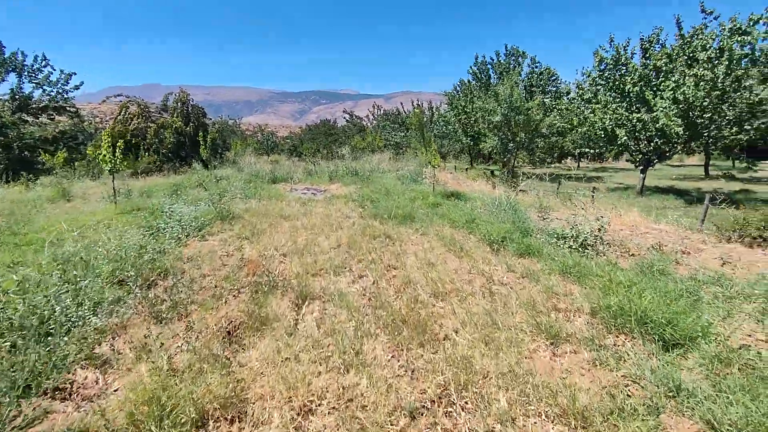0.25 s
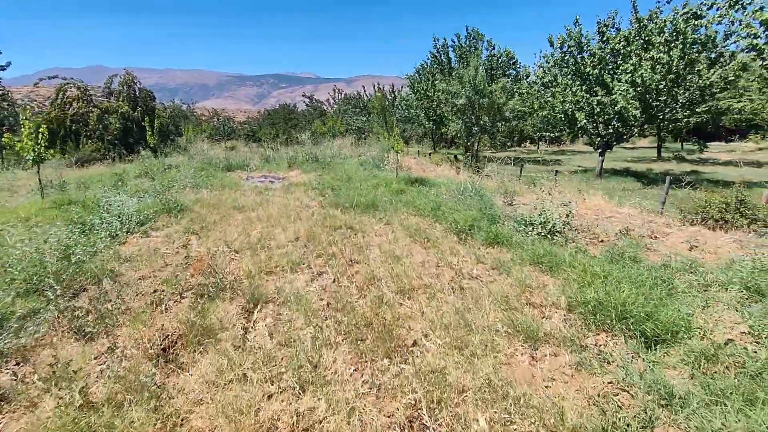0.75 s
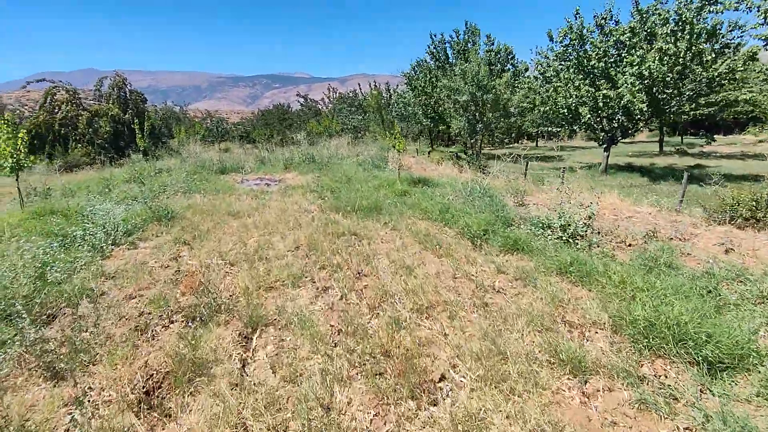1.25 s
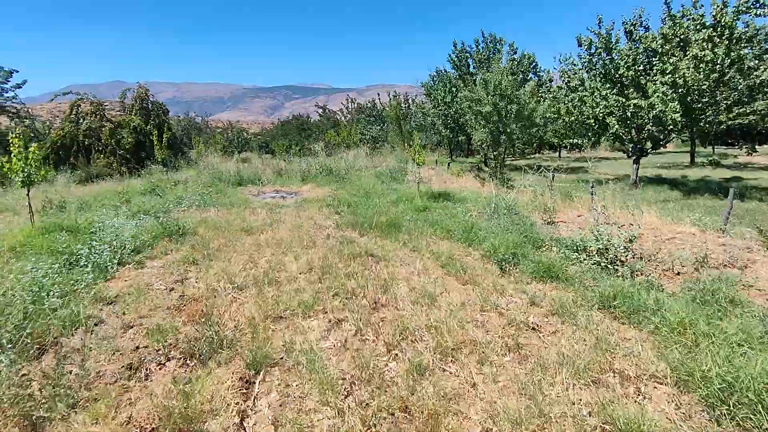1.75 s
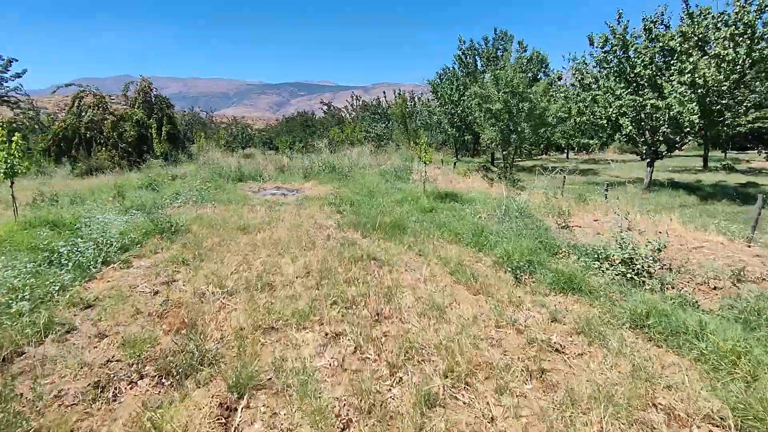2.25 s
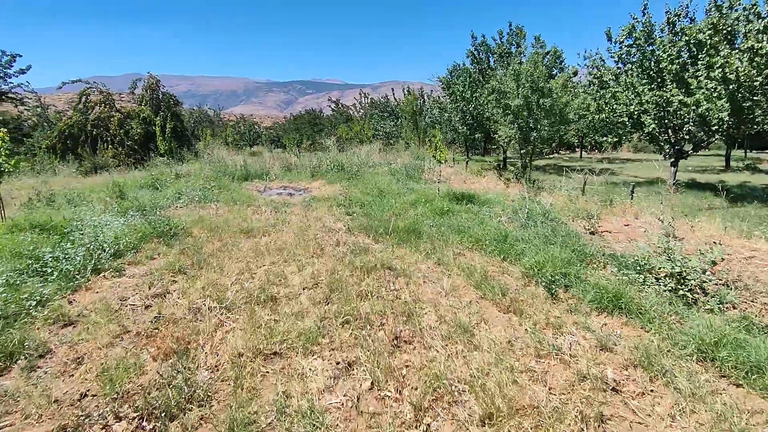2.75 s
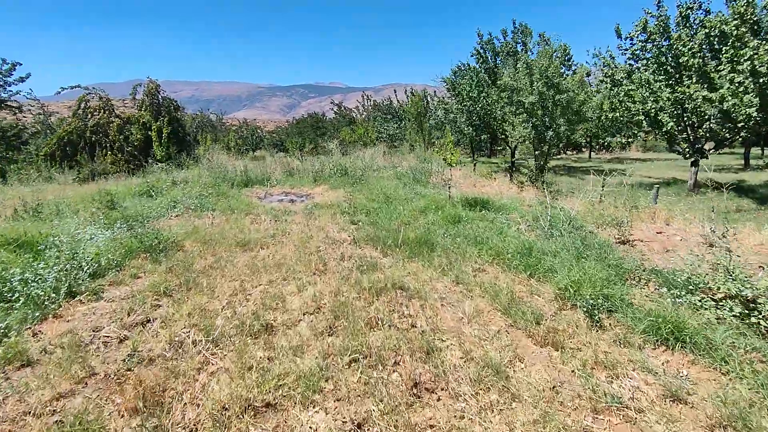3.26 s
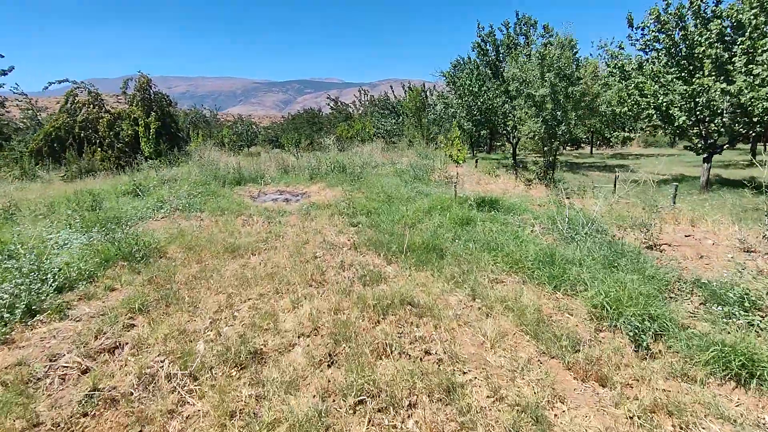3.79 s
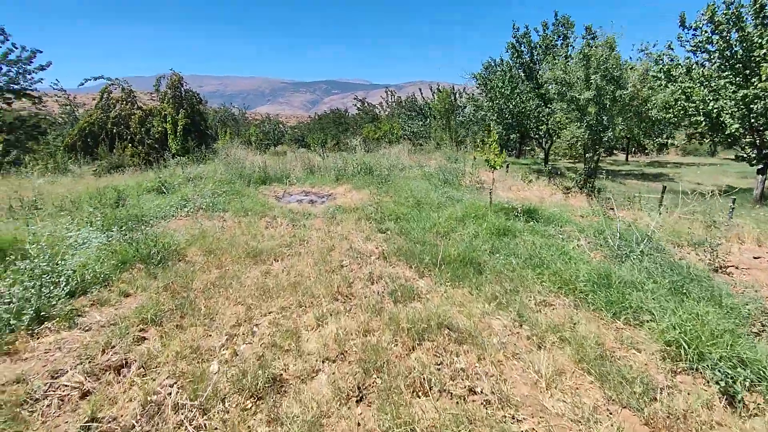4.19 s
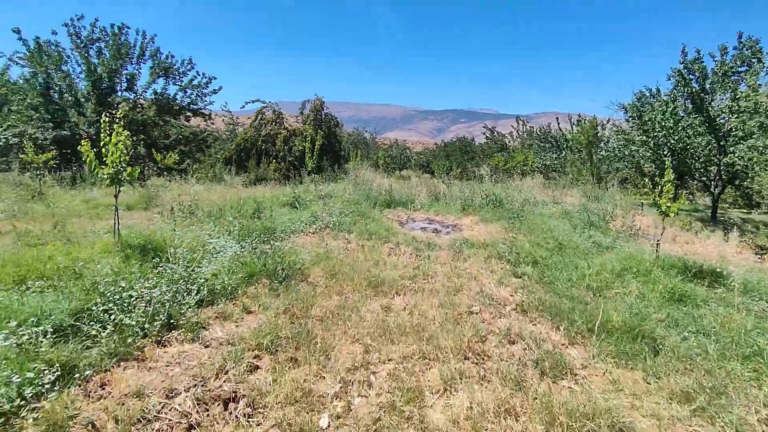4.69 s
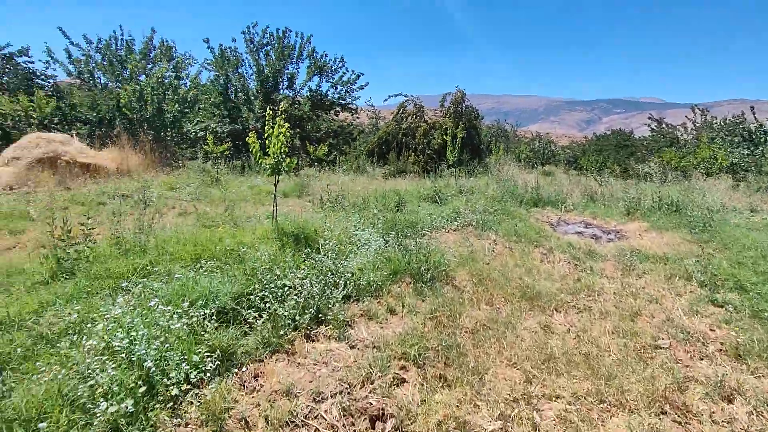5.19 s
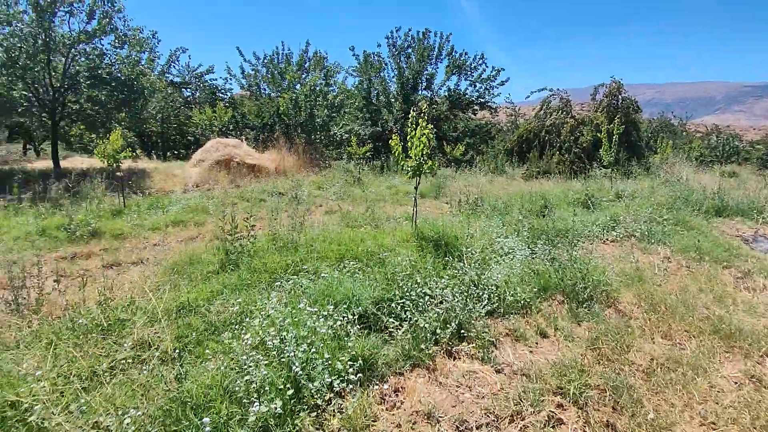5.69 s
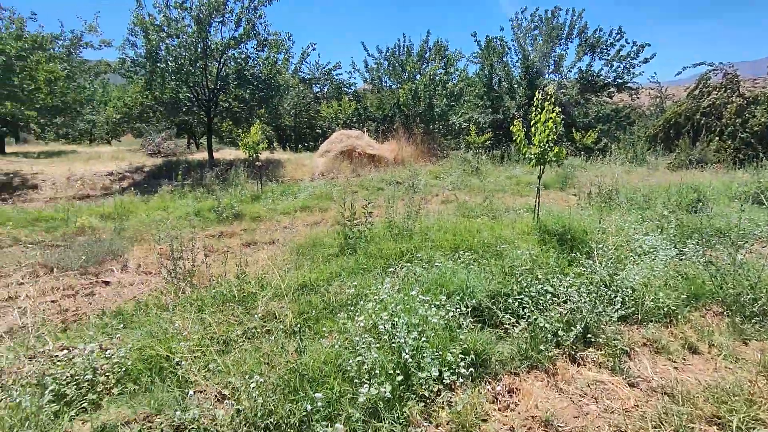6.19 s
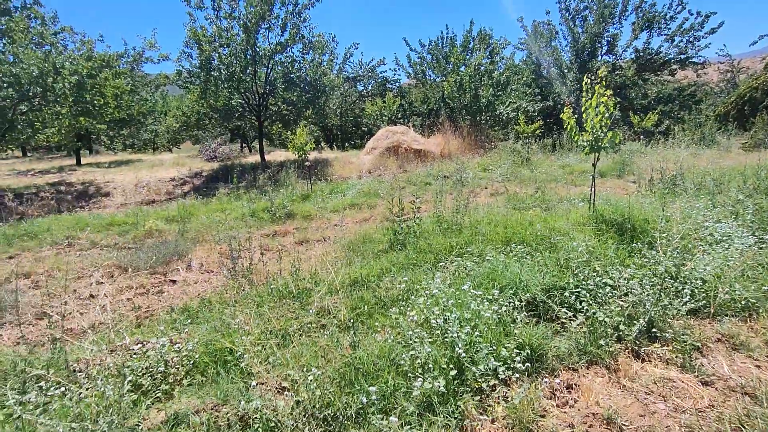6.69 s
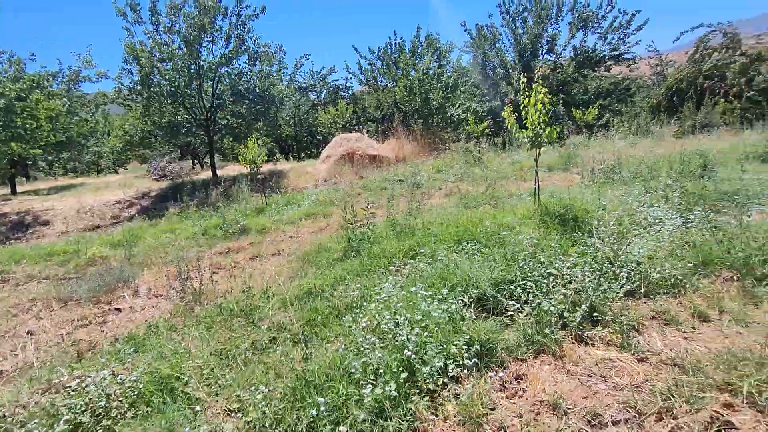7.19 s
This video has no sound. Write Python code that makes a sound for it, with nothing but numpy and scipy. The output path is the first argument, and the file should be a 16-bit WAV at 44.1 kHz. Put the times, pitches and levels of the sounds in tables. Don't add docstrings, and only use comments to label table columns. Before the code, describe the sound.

From 0 to about 7.4 seconds a bright, dense cicada chorus dominates: a rough buzzing layer throbbing about twelve times a second in short bouts, beneath a thinner, steadier high sizzle. It swells slightly around 3.5 seconds and dips a little near 6. Behind lies a very faint countryside murmur. Dry grass brushes and crackles under slow footsteps, clearest near 1.1, 1.6, 2.5, 3.15, 3.9, 4.5, 5.0 and 5.6 seconds, with crisp stem snaps around 1.2. Low insect hums rise near 0.3, 0.7 and 2.5, fainter later. At 0.5-0.6 a fly zips by, its low buzz dropping in pitch. Soft wind thumps bump each side of the hand-held stereo microphone separately, strongest on the left at 3.75 and 4.4. After 5.8 wind and steps recede to faint rustles, leaving cicadas.

```python
import sys
import numpy as np
from scipy import signal
from scipy.fft import rfft, irfft, next_fast_len
from scipy.io import wavfile
from scipy.ndimage import uniform_filter1d

SR = 44100
rng = np.random.default_rng(int(sys.argv[2]) if len(sys.argv) > 2 else 0)


def transcribe(signal):
    frames = np.atleast_2d(signal).T
    limited = np.clip(frames, -1, 1)
    pcm = np.round(limited * 32767).astype(np.int16)
    wavfile.write(sys.argv[1], SR, pcm)


def rack_gain(trim_db):
    fader = np.asarray(trim_db, float)
    return 10 ** (fader / 20)


N = 328545
TIME = np.arange(N) / SR


def curves(table):
    s, *columns = np.transpose(table)
    return np.array([np.interp(TIME, s, c, left=c[0], right=c[-1]) for c in columns])


def unit(x):
    return x / np.sqrt(np.mean(x ** 2, axis=-1, keepdims=True))


def even(x, window_s):
    k = int(window_s * SR)
    power = uniform_filter1d(uniform_filter1d(x ** 2, k), k)
    return x / np.sqrt(power + 1e-12)


def colour(x, table, skirt_db=-18):
    hz, *ports = np.transpose(table)
    log_hz = np.log(np.r_[hz[0] / 1.6, hz[0] / 1.2, hz, hz[-1] * 1.2, hz[-1] * 1.6])
    size = next_fast_len(N)
    log_bins = np.log(np.arange(size // 2 + 1) * SR / size + 1)
    gain_db = []
    for p in ports:
        skirted = np.r_[p[0] + 3 * skirt_db, p[0] + skirt_db, p, p[-1] + skirt_db, p[-1] + 3 * skirt_db]
        gain_db.append(np.interp(log_bins, log_hz, skirted))
    spectrum = rfft(x, size) * rack_gain(np.array(gain_db)) * np.sqrt(SR / 2)
    return irfft(spectrum, size)[:, :N]


def clicks(rate_hz, scatter_db, rows=2):
    hit = rng.random((rows, N)) < rate_hz / SR
    size = rng.standard_normal((rows, N)) * rack_gain(scatter_db * rng.exponential(size=(rows, N)))
    return unit(hit * size)


def walk(rate_hz):
    k = int(SR / rate_hz)
    held = np.repeat(rng.standard_normal((2, N // k + 1)), k, axis=1)
    slewed = uniform_filter1d(uniform_filter1d(held, k), k)
    return unit(slewed[:, :N])


def swells(s, db, rise_s, fall_s, fade_db, still_db, order, hold_s=0):
    t = np.arange(0, N / SR, .002)[:, None]
    before, after = (s - t) / rise_s, (t - s - hold_s) / fall_s
    away = np.maximum(np.maximum(before, after), 0)
    power = rack_gain(2 * (db - fade_db * away ** order)).sum(axis=1)
    return 10 * np.log10(np.interp(TIME, t[:, 0], power) + rack_gain(2 * still_db))


def add(out, s, grain):
    i = max(int(s * SR), 0)
    out[..., i:i + grain.shape[-1]] += grain[..., :N - i]


def tymbals(click_hz, count=90):
    out = np.zeros((2, N))
    for port in out:
        rate = click_hz * (1 + .12 * rng.standard_normal((count, 1)))
        gaps_s = (1 + .15 * rng.standard_normal((count, int(2 * click_hz * N / SR)))) / rate
        at = (np.cumsum(gaps_s, axis=1) * SR).astype(int)
        loudness = rack_gain(1.6 * rng.standard_normal((count, 1)))
        size = np.sign(rng.standard_normal(at.shape)) * loudness
        port += np.bincount(at[at < N], size[at < N], N)
    return unit(out)


# (frequency [Hz], left [dB per Hz], right [dB per Hz])
LOW_CICADAS = [(3320, -93, -90.5), (3758, -83, -79.5), (4250, -76, -64.5), (4534, -68, -59.5),
               (5000, -67, -59), (5340, -63, -57), (5670, -62, -54), (6090, -59, -57), (6480, -61.5, -60),
               (6980, -61, -61.5), (7660, -67, -61), (8230, -65, -65.5), (8720, -69, -69),
               (9200, -72.5, -76.5)]
HIGH_CICADAS = [(9330, -73.5, -74.5), (9960, -69.5, -74.5), (11800, -68.5, -71.5), (12700, -70.5, -72),
                (13330, -71, -76), (14160, -79, -79.5), (15000, -81.5, -90), (15500, -88, -86)]
# (strongest crest [s], depth [0-1], throb rate [Hz], half length [s])
BOUTS = [(0.316, .13, 11, 0.074), (0.643, .12, 12, .26), (1.157, 0.11, 12.5, .26), (1.974, 0.2, 12, .12),
         (2.508, 0.26, 14, .08), (2.984, 0.18, 12.7, 0.21), (3.515, 0.1, 11, .08), (4.708, 0.2, 12.7, 0.23),
         (5.066, .12, 11, 0.071), (5.65, 0.12, 12.8, 0.38), (6.147, 0.07, 13.5, .26),
         (6.817, 0.15, 12.7, 0.14), (7.056, .08, 9.6, .18)]
# (time [s], level [dB])
CHORUS = [
    (0, 0),
    (1.2, 0.06),
    (2.2, 0.07),
    (3.5, 0.4),
    (4.6, 0.3),
    (5.4, .05),
    (5.95, -.5),
    (6.4, -0.3),
    (7.45, -0.44),
]


def cicadas(split_hz=6270.0):
    throb = 0
    for s, depth, hz, half_s in BOUTS:
        bout = depth * np.exp(-((TIME - s) / half_s) ** 2)
        throb = throb + bout * np.cos(2 * np.pi * hz * (TIME - s))
    big = tymbals(220.) * (1 + 1.16 * throb) * rack_gain(0.36 * walk(22) + 0.064 * walk(2.14))
    small = tymbals(260.) * (1 + 0.7 * throb) * rack_gain(0.14 * walk(22) + 0.1 * walk(4.3))
    low = signal.sosfilt(signal.butter(3, split_hz, "low", fs=SR, output="sos"), big)
    low += signal.sosfilt(signal.butter(3, split_hz, "high", fs=SR, output="sos"), small)
    high = tymbals(320.) * (1 + 0.078 * throb) * rack_gain(0.29 * walk(2.6))
    return rack_gain(curves(CHORUS)[0]) * (colour(low, LOW_CICADAS) + colour(high, HIGH_CICADAS))


# (frequency [Hz], left [dB per Hz], right [dB per Hz])
AIR = [(60, -90, -96), (110, -99, -94), (180, -87.5, -86.5), (300, -97.5, -87.5), (500, -102, -89),
       (794, -101, -91), (1200, -101, -92), (1900, -100, -96), (2600, -101, -94.5), (3170, -101, -92.5)]


def air(likeness=0.074):
    noise = rng.standard_normal((3, N))
    mix = np.sqrt(likeness) * noise[2] + np.sqrt(1 - likeness) * noise[:2]
    return colour(mix * rack_gain(.8 * walk(4)), AIR, skirt_db=-3)


# (time [s], level [dB], half length [s])
GUSTS_LEFT = [(0.126, -36.5, .12), (.35, -40, .14), (.63, -39, 0.14), (0.917, -40, .22), (1.64, -38, 0.28),
              (1.97, -42.5, .2), (2.235, -40, 0.17), (2.498, -43.5, .13), (2.797, -43, 0.18),
              (3.134, -41, .11), (3.55, -39.5, 0.18), (3.75, -34.5, 0.19), (4.003, -34, 0.088),
              (4.365, -37, 0.2), (4.743, -36.5, 0.17), (5.105, -44, .12), (5.38, -43.5, 0.14),
              (5.8, -59, 0.24), (6.25, -51.5, .11), (6.623, -45.5, 0.19), (7.05, -52.5, .15),
              (7.264, -50.5, .14)]
GUSTS_RIGHT = [(.02, -35.5, 0.13), (.25, -33.5, 0.12), (.48, -43.5, 0.24), (1.2, -43.5, 0.32),
               (2.1, -46, 0.24), (2.44, -40.5, 0.22), (2.72, -49, .18), (3.17, -48, 0.25),
               (3.5, -45.5, .11), (3.86, -44, 0.09), (4.17, -40, .18), (4.67, -42, 0.2), (5.3, -56, 0.57),
               (6.27, -60, .15), (6.93, -64, .25)]
# (time [s], peak [dB], centre [Hz], port [0
THUMPS = [(0.116, -23.5, 82.6, 0), (0.171, -24, 113, 0), (0.224, -30, 100, 1), (0.255, -27, 98, 1),
          (0.303, -28, 94, 1), (0.413, -29, 91.5, 1), (0.614, -25, 123, 0), (0.866, -24, 82, 0),
          (1.167, -34, 414, 0), (1.458, -31, 89, 0), (1.52, -30.5, 92, 0), (1.922, -26, 108, 0),
          (2.129, -30, 68.4, 0), (2.399, -27.5, 77.5, 1), (2.575, -25.5, 124, 1), (3.215, -23, 135, 0),
          (3.639, -23.5, 120, 0), (3.693, -24, 100, 0), (3.729, -12.5, 157, 0), (3.772, -10, 170, 0),
          (3.79, -33, 78, 1), (3.98, -24.5, 100, 0), (4.187, -29, 89, 0), (4.376, -26, 114, 0),
          (4.422, -15.5, 138, 0), (4.431, -27, 125, 0), (4.468, -31, 91, 1), (4.694, -28, 92, 0),
          (4.852, -31, 100, 0), (5.314, -27, 79, 0)]


def wind(slow_hz=105.0, fast_hz=180.0, knee_db=-40):
    eddies = clicks(300, 2.15) * rack_gain(5.7 * walk(22))
    gust_db = []
    for gusts, lull_db in ((GUSTS_LEFT, -59), (GUSTS_RIGHT, -64)):
        s, db, half_s = np.transpose(gusts)
        gust_db.append(swells(s, db, half_s, half_s, 11.5, lull_db, order=2))
    gust_db = np.array(gust_db)

    def roll(hz):
        high = signal.butter(1, hz / 6, "high", fs=SR, output="sos")
        low = signal.butter(4, hz, fs=SR, output="sos")
        return even(signal.sosfilt(np.r_[high, low], eddies), 0.1)

    quickening = rack_gain(0.46 * (gust_db - knee_db) - 13.0)
    out = (roll(slow_hz) + roll(fast_hz) * quickening) * rack_gain(gust_db - 1.5)
    t = np.arange(-1500, 1500) / SR
    for s, db, hz, port in THUMPS:
        u = (np.pi * .8 * hz * t) ** 2
        add(out[int(port > .5)], s - 1500 / SR, rack_gain(db) * (1 - 3 * u) / (1 + u) ** 3)
    return out


# (frequency [Hz], left [dB], right [dB])
STALKS = [(201, -15, -6), (318, -2.5, -0.5), (444, -1, -0.5), (600, 0, 0), (855, -2.5, -1), (1104, -4, -6)]
BLADES = [(970, -5, -10), (1400, 1.5, 1), (2100, -3, 0.5), (3200, -2, -2.5), (7000, -7.5, -26)]
# (time [s], level [dB], swing before [s], settling after [s], blades over stalks [dB])
STEPS = [(.225, -59, .2, 0.15, 3.5), (.67, -62.5, 0.31, 0.31, 5.5), (.91, -61, 0.19, 0.073, 4),
         (1.095, -53.5, 0.17, 0.055, 2.7), (1.21, -62, 0.088, 0.16, 4.5), (1.645, -56.5, .12, 0.067, -2),
         (2.49, -52.5, 0.28, 0.026, 2), (2.77, -66, 0.31, .05, 1), (3.0, -61.5, 0.058, 0.25, 1),
         (3.155, -53, 0.076, .04, 0), (3.22, -60.5, .03, 0.091, 2), (3.52, -65.5, 0.054, 0.23, 4),
         (3.77, -69, .08, .05, 3), (3.862, -56.5, 0.043, 0.06, 2), (4.52, -55.5, 0.15, 0.051, 0),
         (4.63, -62, .07, 0.076, -1), (4.8, -63, .15, .1, -5), (5.028, -53, .02, .07, 0.5),
         (5.32, -64, .15, 0.2, -2.1), (5.648, -54.5, 0.016, .05, -1.5), (6.17, -65, 0.45, 0.23, -4),
         (6.34, -67, .05, .4, -9), (6.73, -67, .05, .4, -12), (7.08, -66, 0.018, .03, -9)]
# (time [s], level [dB])
BRUSH = [
    (0, -58),
    (.5, -64),
    (1.3, -69),
    (2.2, -66),
    (3.6, -64.5),
    (4.15, -63.5),
    (4.8, -69),
    (5.8, -70),
    (7.45, -72),
]


def grass(likeness=0.43, lag_samples=4):
    out, flutter = 0, walk(70)
    s, step_db, swing_s, settle_s, blades_db = np.transpose(STEPS)
    brush_db = curves(BRUSH)[0]
    for table, extra_db, rate_hz in ((STALKS, 0, 1400), (BLADES, blades_db, 3000)):
        db = swells(s, step_db + extra_db, swing_s, settle_s, 15, brush_db, order=1, hold_s=0.024)
        bits = clicks(rate_hz, 2.5, rows=3)
        common = np.array([np.roll(bits[2], lag_samples), bits[2]])
        mix = np.sqrt(likeness) * common + np.sqrt(1 - likeness) * bits[:2]
        out = out + even(colour(mix, table), 0.042) * rack_gain(db + 1.7 * flutter[0] + 1.0)
    return out


# (time [s], peak [dB], ring [Hz], low knock [dB], left minus right [dB])
SNAPS = [(.182, -43, 2600, -5, 11), (.236, -43, 1490, -1, 2), (1.023, -41, 1800, -4, -1),
         (1.051, -41, 1700, -6, 0), (1.095, -39.5, 1510, 3, 3), (1.1658, -29.5, 1710, -3, 2),
         (1.225, -27, 1450, -9, 4), (1.262, -43, 1500, -13, 4), (1.825, -43, 1550, -13, 1),
         (3.147, -48, 1500, 5, 0), (3.225, -37.5, 1600, -12, -1), (3.865, -44.5, 1800, 6, 2),
         (3.907, -43, 1300, -16, 0), (4.538, -40, 900, -20, 3), (4.599, -44, 1600, -6, 5),
         (4.622, -44, 1700, -12, -2), (5.028, -47, 1680, 5, 3), (5.07, -42, 1400, -7, 0),
         (5.22, -44, 900, -14, 3), (5.65, -48, 1750, -9, 0), (7.083, -53, 1490, 6, -12)]


def snaps(cycles=0.9, knock_pitch=0.48):
    out, t = np.zeros((2, N)), np.arange(600) / SR
    for s, db, hz, knock_db, pan_db in SNAPS:
        port_gain = rack_gain(db + np.array([[pan_db], [-pan_db]]) / 2)
        for f, gain in ((hz, 1), (knock_pitch * hz, rack_gain(knock_db))):
            u = t * f / cycles
            ring = gain * np.cos(2 * np.pi * f * t) * (u * np.exp(1 - u)) ** 2
            add(out, s, ring * port_gain)
    return out


# (time [s], level [dB], arrival [s], leaving [s])
SWARMS = [
    (.29, -53, .3, 0.38),
    (.68, -52, .13, .35),
    (1.72, -61.5, 0.23, .6),
    (2.51, -49.5, .28, 0.12),
    (2.7, -61.5, .15, .9),
    (3.94, -63, .4, .9),
    (5.04, -62, .1, .16),
    (5.33, -67, .4, .7),
]


def hum(hz=400.0, width_hz=106.0):
    band = signal.butter(2, [hz - width_hz / 2, hz + width_hz / 2], "band", fs=SR, output="sos")
    tone = unit(signal.sosfilt(band, rng.standard_normal(N)))
    swarm_db = swells(*np.transpose(SWARMS), fade_db=16, still_db=-79, order=1)
    return tone * rack_gain(swarm_db - 5.5 + np.array([[1.5], [-3.5]]))


# (time [s], wing beat [Hz], level [dB])
FLY = [
    (0.5, 151, -62),
    (0.53, 151, -41),
    (0.555, 139, -38.5),
    (0.58, 123, -41),
    (0.605, 110, -35),
    (0.625, 108, -58),
]


def fly(nearest_s=0.573, third_s=0.027):
    hz, db = curves(FLY)
    phase = 2 * np.pi * np.cumsum(hz) / SR
    near = (TIME > FLY[0][0]) & (TIME < FLY[-1][0])
    third_db = -48.5 - 6.5 * ((TIME - nearest_s) / third_s) ** 2
    buzz = rack_gain(db) * np.sin(phase)
    buzz += rack_gain(db - 21) * np.sin(2 * phase)
    buzz += rack_gain(third_db) * np.sin(3 * phase)
    return np.sqrt(2) * near * buzz * rack_gain(np.array([[1.5], [-1.5]]))


def scene():
    return cicadas() + air() + wind() + grass() + snaps() + hum() + fly()


def top_cut(x):
    return signal.sosfilt(signal.butter(12, 15780, fs=SR, output="sos"), x)


def record(dry):
    return top_cut(dry)


dry = scene()
out = record(dry)
transcribe(out)
```